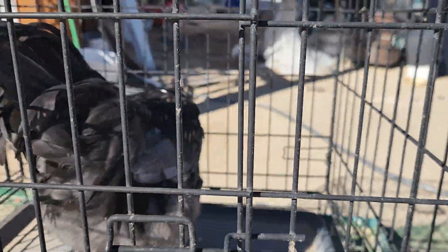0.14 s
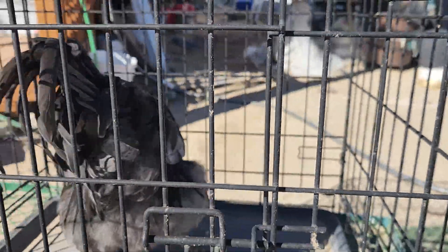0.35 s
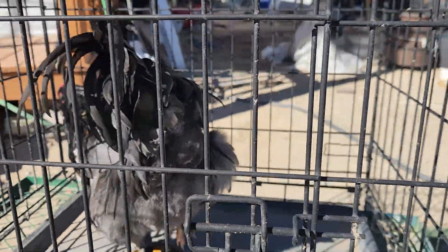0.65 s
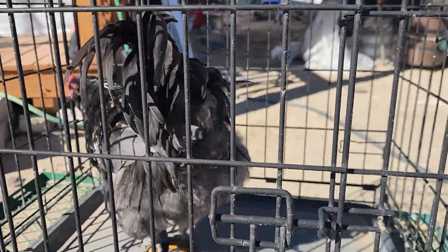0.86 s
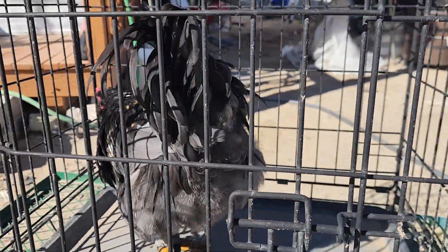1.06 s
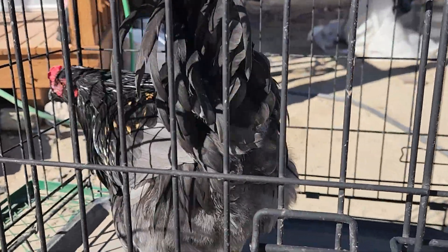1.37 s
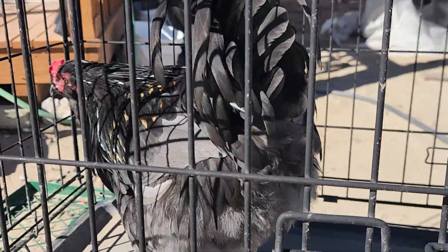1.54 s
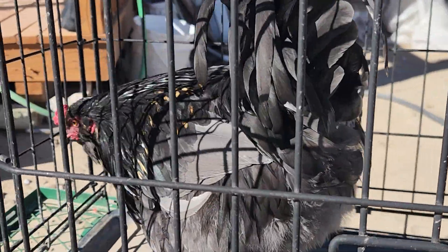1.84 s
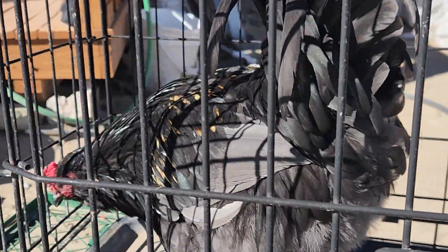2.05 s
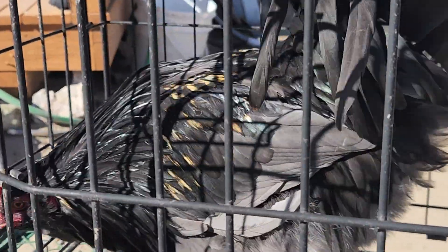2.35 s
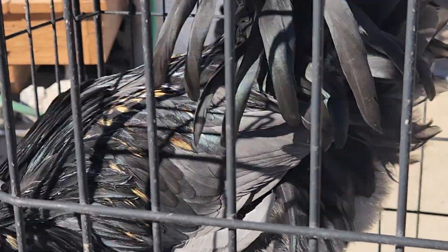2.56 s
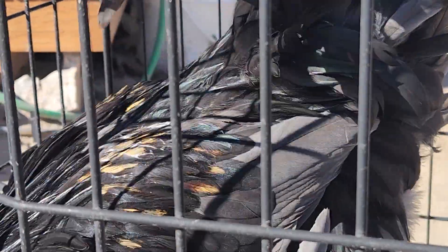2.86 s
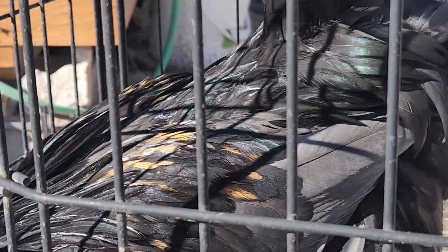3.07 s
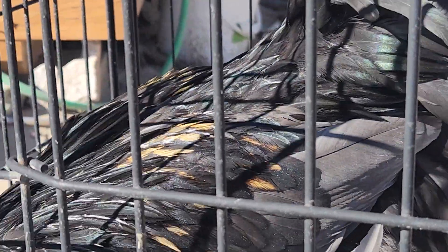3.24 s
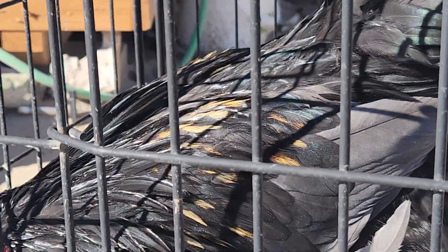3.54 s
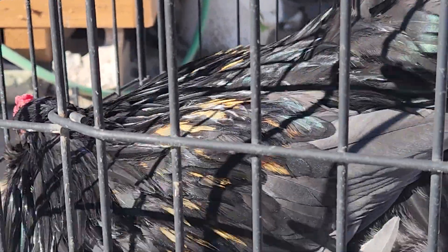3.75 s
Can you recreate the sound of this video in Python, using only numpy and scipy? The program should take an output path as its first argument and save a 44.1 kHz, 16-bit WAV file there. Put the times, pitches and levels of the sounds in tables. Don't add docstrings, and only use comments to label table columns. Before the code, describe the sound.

A rooster in a wire crate taps and scrapes its plastic tray during the first second. At about 1.3-1.8 s it gives one hoarse, creaky squawk, a whistling held note breaking into a short falling lower one, with slight outdoor echo. Harder knocks and shivering wires come at 2.2-2.9 s, faint taps near 3.8 s. Low wind rumble swells late, over soft hush and very faint hens; treble is dull.

```python
import sys
import numpy as np
from scipy import signal
from scipy.fft import rfft, irfft
from scipy.io import wavfile
from scipy.ndimage import uniform_filter1d, map_coordinates

SR = 44100
rng = np.random.default_rng(int(sys.argv[2]) if len(sys.argv) > 2 else 0)


def pcm_store(signal):
    levels = np.round(np.clip(np.atleast_2d(signal), -1, 1) * 32767)
    wavfile.write(sys.argv[1], SR, levels.astype(np.int16).T)


def decibels_to_gain(level_db):
    exponent = np.asarray(level_db, float) / 20
    return 10 ** exponent


N = 171990


def unit(x):
    return x / np.sqrt(np.mean(x ** 2) + 1e-30)


def band(x, hz, width):
    return signal.lfilter(*signal.iirpeak(hz, hz / width, SR), x)


def log_bins():
    return np.log(np.fft.rfftfreq(N, 1 / SR) + 1)


def colour(x, table):
    hz, db = np.array(table).T
    gain = decibels_to_gain(np.interp(log_bins(), np.log(hz), db))
    return unit(irfft(rfft(x) * gain, N))


def walk(rate):
    k = int(SR / rate)
    steps = np.repeat(rng.standard_normal(N // k + 1), k)
    return unit(uniform_filter1d(uniform_filter1d(steps, k), k)[:N])


def pair(likeness):
    mid, side = rng.standard_normal((2, N))
    return np.sqrt(1 + likeness) * mid + np.sqrt(1 - likeness) * side * np.array([[1], [-1]])


def gate(start, length, edge):
    t = np.arange(N) / SR
    return np.clip(np.minimum(t - start, start + length - t) / edge, 0, 1)


def decay(t, t60):
    return np.exp(-np.log(1000) * t / t60)


def sides(db):
    return decibels_to_gain(np.array([db, -db]) / 2)


def lean(x, table):
    hz, db, lead = np.array(table).T
    at = log_bins()
    turn = np.exp(.5j * np.interp(at, np.log(hz), lead) * np.array([[1], [-1]]))
    return irfft(rfft(x) * turn * sides(np.interp(at, np.log(hz), db)), N)


def bird_pan_db(s):
    return np.interp(s, [.3, 1, 2.3, 2.8, 3.8], [0.1, 0.16, 1.3, 1.6, .1])


# time in seconds, level in dB.
WIND = [(0, -39.5), (1.08, -44), (1.22, -38), (1.452, -44), (1.701, -35.5), (2.12, -46.5), (2.399, -37.5),
        (2.62, -33), (2.748, -40), (3.047, -35.5), (3.402, -27), (3.551, -46.5), (3.739, -29), (3.9, -46)]
# frequency in Hz, density in dB per Hz.
WIND_COLOUR = [(15, -35.5), (30, 3.5), (65, 5), (105, -1.5), (170, -22), (300, -35), (600, -49),
               (1500, -61.5)]


def wind():
    s, db = np.array(WIND).T
    t = np.arange(N) / SR
    rumble = colour(pair(.55), WIND_COLOUR)
    edge = band(rumble, 250, 250) * decibels_to_gain(3 + 4 * walk(18))
    buffeted = rumble * decibels_to_gain(1.6 * walk(21.635)) + edge
    lean_db = np.interp(t, [0, 2.6, 3.1, 3.9], [0.5, 1.0, 4.0, 2.5])
    return buffeted * decibels_to_gain(np.interp(t, s, db) - 1.5) * sides(lean_db)


# frequency in Hz, density in dB per Hz.
YARD = [(200, -6.5), (500, -12.5), (1000, -7.5), (1800, -21), (7800, -23), (9500, -40), (16000, -27)]


def yard():
    return decibels_to_gain(-66.5 + 0.13 * walk(13.0)) * colour(pair(0.15), YARD)


# centre in Hz, width in Hz, level in dB.
CRATE = [(850, 110, 0), (1500, 250, -5), (2350, 144, -4), (2950, 133, -7), (3826, 180, -7.5),
         (4433, 140, -3), (5480, 43, -9)]


def crate(x):
    song = sum(decibels_to_gain(db) * band(x, hz, width) for hz, width, db in CRATE)
    return unit(x + decibels_to_gain(2) * song)


LIKENESS = 0.54
# start in seconds, length in seconds, level in dB,
# centre in Hz, treble in dB.
SCRAPES = [(0, 0.02, -47.5, 2570, -10), (0.188, 0.046, -53, 1500, -9), (0.22, 0.021, -44.5, 2450, -13),
           (0.533, 0.14, -45, 3270, 9), (0.648, 0.094, -51, 3600, -1), (0.762, 0.042, -56, 2960, 3),
           (0.867, 0.063, -61.5, 2980, 6), (0.948, 0.08, -59, 4300, 13), (2.211, 0.06, -50.5, 3020, 0.5),
           (2.273, 0.018, -38, 4020, 2), (2.468, 0.029, -37, 2860, 5.5), (2.493, 0.033, -40, 2860, -3.5),
           (2.581, 0.076, -49, 2550, 4.5), (2.655, 0.065, -40, 3660, -14.5), (2.673, 0.021, -45, 4030, 30),
           (2.698, 0.038, -57, 3700, -14), (2.823, 0.044, -37, 3330, 3.5), (3.829, 0.03, -51, 2930, -3.5),
           (3.86, 0.035, -54.5, 3000, 10)]
# frequency in Hz, density in dB per Hz.
SCRAPE_COLOUR = [(300, -15.5), (1000, -4), (1900, -11.5), (2700, -4.5), (7500, -9), (16000, -10)]


def scrapes():
    grit = pair(LIKENESS) * decibels_to_gain(3 * rng.exponential(size=N) + 2.2 * walk(160))
    base = crate(colour(grit, SCRAPE_COLOUR))
    treble = signal.sosfilt(signal.butter(4, 8000, "high", fs=SR, output="sos"), base)
    out = np.zeros((2, N))
    for s, length, db, hz, treble_db in SCRAPES:
        shape = gate(s, length, min(0.28 * length, .03))
        on = np.flatnonzero(shape)
        rub = unit(base[:, on] + 2.4 * band(base[:, on], hz, 0.94 * hz))
        rub = rub + (decibels_to_gain(treble_db) - 1) * 0.2 * treble[:, on]
        out[:, on] += decibels_to_gain(db) * shape[on] * rub * sides(bird_pan_db(s))[:, None]
    return out


def ring(modes, chance):
    t = np.arange(4096) / SR
    x = 0
    for (hz, db, t60), c in zip(modes, chance):
        tone = np.sin(2 * np.pi * hz * (1 + 0.06 * c) * t)
        x = x + decibels_to_gain(db + 1.63 * c) * tone * decay(t, t60)
    return x / np.abs(x).max()


# start in seconds, knock peak in dB, tray thump in dB, wire tick in dB.
TAPS = [(0.098, -54, -68, -61), (0.169, -42.5, -54, -59), (0.202, -27, -28.5, -45),
        (0.231, -36, -25.5, -41.5), (0.301, -31.5, -39, -49.5), (0.408, -51.5, -54, -80),
        (0.458, -55, -44, -68), (0.509, -35, -40, -67), (0.558, -51, -37, -45), (0.672, -23, -47, -50),
        (0.708, -61, -66, -42.5), (0.73, -62, -60, -49.5), (0.774, -29.5, -59, -41.5),
        (0.897, -49, -76, -50.5), (1.224, -49, -36.5, -50), (2.224, -74.5, -42.5, -41.5),
        (2.267, -46, -36.5, -41.5), (2.278, -60, -46.5, -36.5), (2.409, -29.5, -43, -52),
        (2.42, -37, -29, -41), (2.442, -31.5, -31, -44), (2.477, -51, -20.5, -37),
        (2.481, -16.5, -25.5, -47), (2.503, -25, -31.5, -44), (2.566, -35, -38.5, -43),
        (2.606, -34, -36, -45), (2.624, -33.5, -32.5, -45), (2.833, -18, -31, -23.5),
        (2.853, -17.5, -21, -27.5), (3.372, -52.5, -61, -59.5), (3.46, -72, -73, -64.5),
        (3.703, -70.5, -70, -61.5), (3.835, -30.5, -38.5, -69.5), (3.877, -36, -42, -56.5)]
# pitch in Hz, level in dB, 60 dB decay in seconds.
TRAY = [(284.8, -2.5, 0.1), (352.5, 4, 0.041), (574, -0.5, 0.031), (980, 9, .015), (1480, -2, 0.0066)]
WIRE_HZ, WIRE_OCTAVES, WIRE_T60_S = 3600, 0.95, 0.026


def taps():
    out, t = np.zeros((2, N + 4096)), np.arange(4096) / SR
    chance = rng.standard_normal((len(TAPS), 24))
    for (s, knock_db, thump_db, tick_db), c in zip(TAPS, chance):
        wires = ring([(WIRE_HZ * 2 ** (WIRE_OCTAVES * u), 0, WIRE_T60_S) for u in c[14:]], c[6:])
        crack = band(rng.standard_normal((2, 4096)), 3600, 14000)
        crack = crack * np.exp(-t / 0.0017) * np.minimum(t / 0.0006, 1)
        knock = decibels_to_gain(knock_db - 5) * ring(TRAY[2:], c)
        thump = decibels_to_gain(thump_db) * ring(TRAY[:2], c[3:])
        tick = decibels_to_gain(tick_db + 7.5) * (wires + 0.74 * crack)
        i = int(s * SR)
        out[:, i:i + 4096] += (knock + thump + tick) * sides(bird_pan_db(s))[:, None]
    return out[:, :N]


# start in seconds, level in dB, 60 dB decay in seconds.
SHIVERS = [
    (.24, -56, 1),
    (2.29, -62, 0.19),
    (2.53, -52.5, 0.55),
    (2.861, -46.5, 0.74),
]
# frequency in Hz, density in dB per Hz.
SHIVER_COLOUR = [(150, 9.5), (300, 11), (800, 2.5), (2000, 0), (6000, -9.5), (13000, -13.5)]


def shivers():
    t = np.arange(N) / SR
    fade = 0
    for s, db, t60 in SHIVERS:
        fade = fade + decibels_to_gain(db - 60 * np.maximum(t - s, 0) / t60) * gate(s, 0.9, .005)
    return fade * decibels_to_gain(1.2 * walk(40)) * crate(colour(pair(LIKENESS), SHIVER_COLOUR))


# frequency in Hz, lean in dB, left lead in radians.
FEET_LEAN = [(300, 0, .3), (1400, 3, 1.6), (2100, 0, -.8), (4600, -5, -2.2), (7200, 0, 0), (9300, 14, -1.5),
             (13500, 5, -1)]


def feet():
    return lean(taps() + scrapes() + shivers(), FEET_LEAN)


# start in seconds, length in seconds, pitch in Hz, level in dB, hoarseness in %.
HENS = [
    (.37, .15, 1100, -65, 4),
    (.28, .2, 2350, -69, 2),
    (.765, .12, 985, -61, .2),
    (2.14, .08, 1090, -71, .3),
    (2.3, .1, 790, -69, .5),
    (3.44, .13, 815, -72, .3),
    (3.43, .17, 1120, -68, 5),
    (3.6, .09, 1080, -69, .3),
]


def hens():
    t, out = np.arange(N) / SR, 0
    for s, length, hz, db, hoarse in HENS:
        glide = 1 - 0.3 * (t - s - length / 2) + hoarse / 50 * walk(300)
        phase = 2 * np.pi * np.cumsum(hz * glide) / SR
        note = np.sin(phase + np.array([[0], [1.2]]))
        out = out + decibels_to_gain(db + 3 * walk(30)) * gate(s, length, .03) * note
    return out


def follow(rows):
    rows = np.array(rows).T
    s = rows[0]
    cols = [np.interp(np.arange(N) / SR, s, c) for c in rows[1:]]
    cols[1] = decibels_to_gain(cols[1]) * gate(s[0], s[-1] - s[0], .004)
    return cols


def voice(parts, tones_db, rasp):
    out, waver = np.zeros(N), walk(40.56)
    for rows in parts:
        hz, gain, *tilt = follow(rows)
        on = np.flatnonzero(gain)
        shaken_hz = hz * (1 + rasp / 40 * walk(150))
        phase = 2 * np.pi * np.cumsum(shaken_hz[on]) / SR
        tilt_db = tilt[0][on] if tilt else 0
        for k, db in enumerate(tones_db):
            wobble_db = 1.5 * waver[on - k * SR // 9]
            out[on] += gain[on] * decibels_to_gain(db + k * tilt_db + wobble_db) * np.sin((k + 1) * phase + k)
    return out * (1 + rasp * walk(450))


# time in seconds, flaps in Hz, level in dB, roughness 0-1, breath in dB.
CREAK = [
    [(1.314, 205.6, -35, 0.1, -0.5), (1.34, 208.3, -29.5, 0.06, 0.5), (1.37, 206, -24.5, 0.1, -2.5),
     (1.41, 209.5, -32.5, 0.04, -4.5), (1.445, 213.3, -29, 0, -5.5), (1.495, 209.3, -33, 0.01, -4),
     (1.53, 205.4, -47, 0.11, -4.5), (1.62, 208.6, -48.5, 0.2, 2)],
    [(1.632, 384, -38, 0.05, 0), (1.68, 379.3, -38.5, 0.01, 1.5), (1.72, 372.7, -42, 0.04, -2.5),
     (1.76, 367, -48, 0.2, -16), (1.79, 351, -67, 0.3, 6.5)],
]
# centre in Hz, width in Hz, level in dB.
THROAT = [(460, 62, -24), (801, 140, -14), (1244, 300, 2.5), (1600, 240, 3.5), (2250, 340, -5),
          (3200, 1300, -5), (4600, 610, -9), (6160, 1600, -25)]


def creak():
    out = 0
    for rows in CREAK:
        rate, gain, rough, breath_db = follow(rows)
        phase = np.cumsum(rate * (1 + rough / 2 * walk(200))) / SR
        flaps = np.diff(np.floor(phase), prepend=0) * decibels_to_gain(4.7 * rough * walk(290))
        puffs = np.exp(-phase % 1 / .5) * rng.standard_normal(N)
        air = unit(flaps) + decibels_to_gain(breath_db) * unit(puffs)
        throat = sum(decibels_to_gain(db) * unit(band(band(air, hz, w), hz, w)) for hz, w, db in THROAT)
        out = out + gain * unit(throat)
    return out


# time in seconds, pitch in Hz, level in dB, tilt in dB per overtone.
WHISTLE = [
    [(1.365, 1024, -34, 0), (1.395, 1039, -27, -1), (1.425, 1054, -32, -3), (1.47, 1054, -31, -3),
     (1.505, 1035, -30, .5), (1.56, 1021, -25, 0), (1.59, 1022, -28, -3), (1.635, 1025, -42, -2)],
    [(1.63, 1155, -35, -2), (1.675, 1137, -39, -3), (1.74, 1118, -52, -4)],
    [(1.415, 1475, -35, -15), (1.47, 1478, -30, -15), (1.535, 1450, -44, -15)],
    [(1.415, 1680, -40, -15), (1.445, 1690, -32, -15), (1.48, 1680, -42, -15)],
]
# level in dB, from the fundamental up.
WHISTLE_TONES_DB = [3, -2, -7, -10, -19, -27, -33, -40, -42, -46, -48, -52, -55, -58]
# time in seconds, pitch in Hz, level in dB.
LOWER = [
    [(1.573, 777, -47.5), (1.6, 725, -30), (1.645, 750, -55)],
    [(1.67, 795, -46), (1.69, 780.6, -27), (1.725, 742, -27.5), (1.75, 729, -42), (1.795, 706, -50)],
]
# level in dB, from the fundamental up.
LOWER_TONES_DB = [-12, -12.5, -14, -20.5, -25, -23]
# left delay in ms, right delay in ms, left level in dB, right level in dB.
PATHS = [
    (0, 0, -1, 0.5),
    (6.3, 7, -24, -5),
    (13.7, 13.5, -16, -4.5),
]
# frequency in Hz, lean in dB, left lead in radians.
CALL_LEAN = [(600, 0, -.3), (950, 0, 2.9), (1700, 0, 2.8), (2100, 8, .7), (3100, 0, -.7), (4200, -7, -4.2),
             (5200, -3, -5.9), (9300, 14, -5.5)]


def rooster():
    call = voice(WHISTLE, WHISTLE_TONES_DB, 0.11) + voice(LOWER, LOWER_TONES_DB, 0.38) + creak()

    def late(ms):
        return map_coordinates(call, [np.arange(N) - ms * SR / 1000], order=1)

    out = np.zeros((2, N))
    for left_ms, right_ms, left_db, right_db in PATHS:
        out += np.array([decibels_to_gain(left_db) * late(left_ms), decibels_to_gain(right_db) * late(right_ms)])
    return lean(out, CALL_LEAN)


def echo(x):
    t = np.arange(SR // 2) / SR
    tail = band(rng.standard_normal((2, len(t))), 830, 4300)
    tail = tail * decay(t, 0.35) * np.minimum(t / 0.01, 1)
    tail = tail / np.sqrt(np.sum(tail ** 2) / 2)
    return decibels_to_gain(-18) * signal.fftconvolve(x, tail, axes=1)[:, :N]


def scene():
    air = wind() + yard()
    steps = feet()
    flock = hens()
    call = rooster()
    return air + steps + flock + call + echo(decibels_to_gain(-10.5) * call + steps)


def band_limit(x):
    return signal.sosfilt(signal.butter(12, 16640, fs=SR, output="sos"), x)


# frequency in Hz, gain in dB.
MIC = [(7000, 2), (8600, -10), (9500, -15), (11000, -13), (12500, -9), (16000, -19), (16700, -58.5)]


def record(dry):
    hz, db = np.array(MIC).T
    gain = decibels_to_gain(np.interp(np.fft.rfftfreq(N, 1 / SR), hz, db))
    mix = irfft(rfft(dry) * gain, N)
    return band_limit(mix)


dry = scene()
out = record(dry)
pcm_store(out)
```